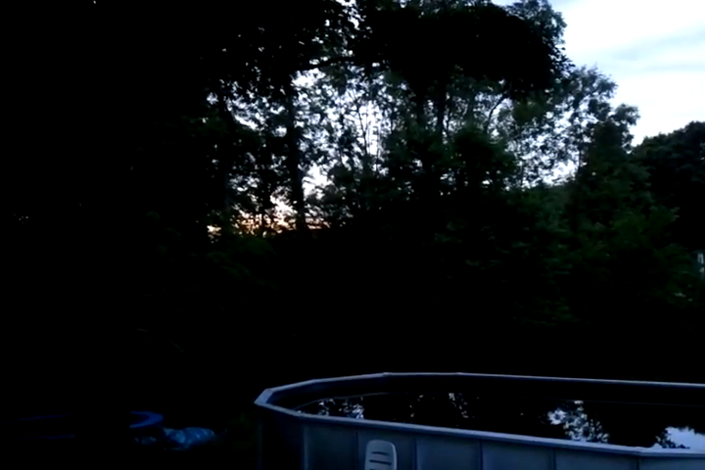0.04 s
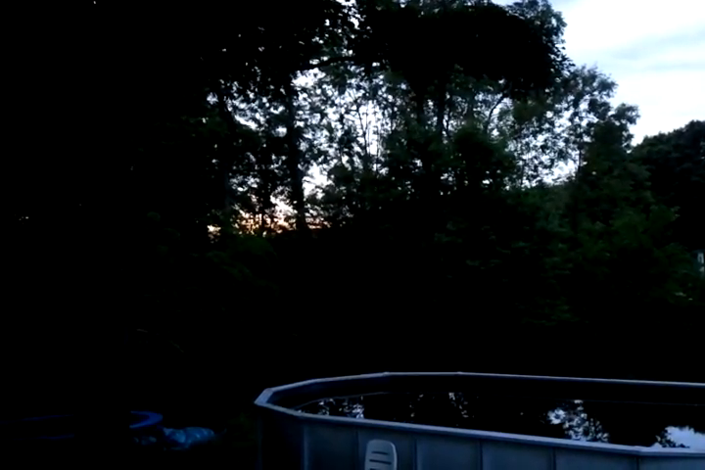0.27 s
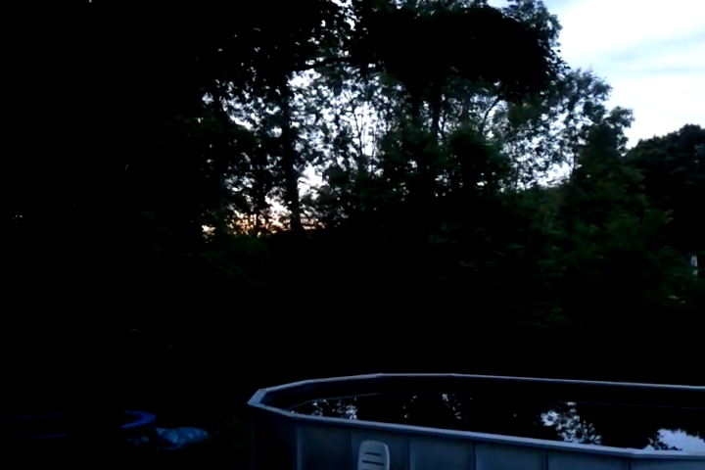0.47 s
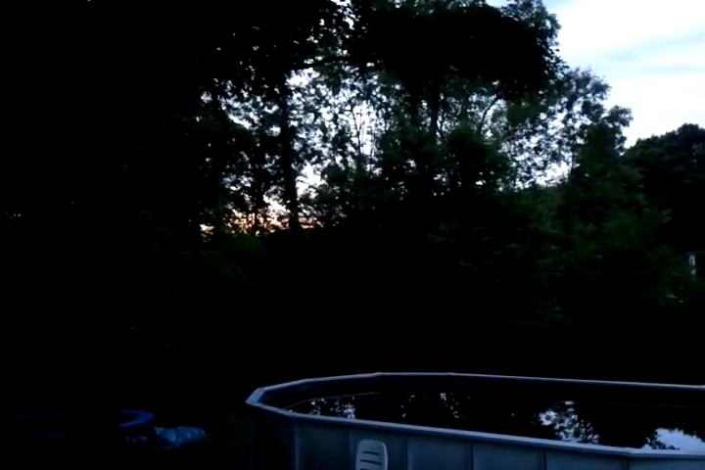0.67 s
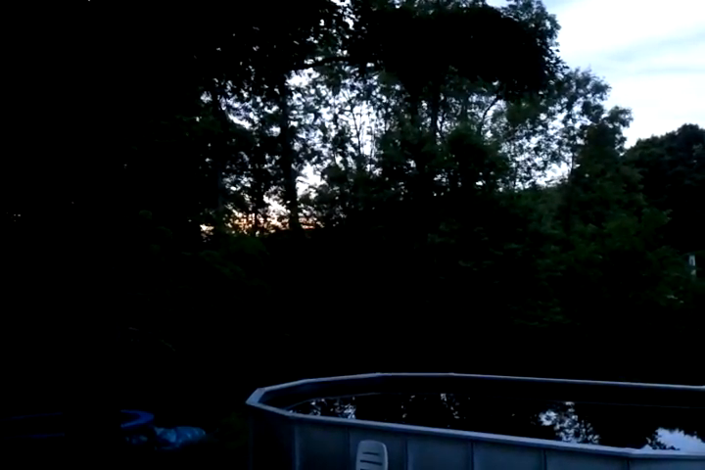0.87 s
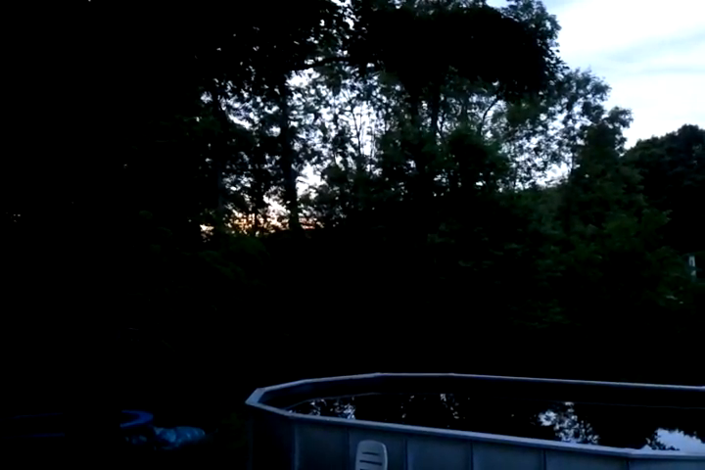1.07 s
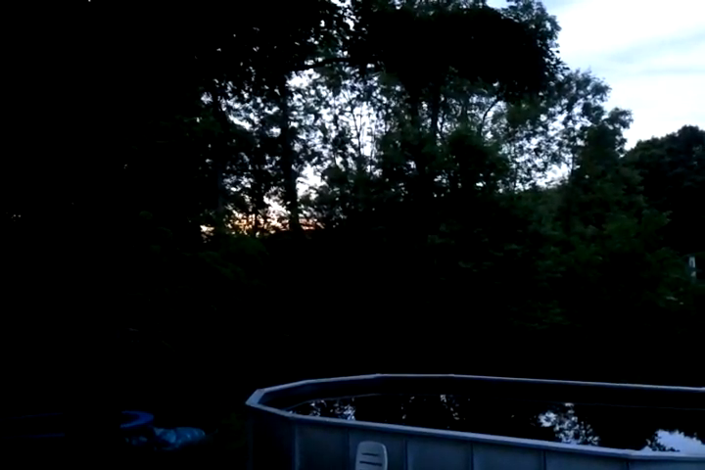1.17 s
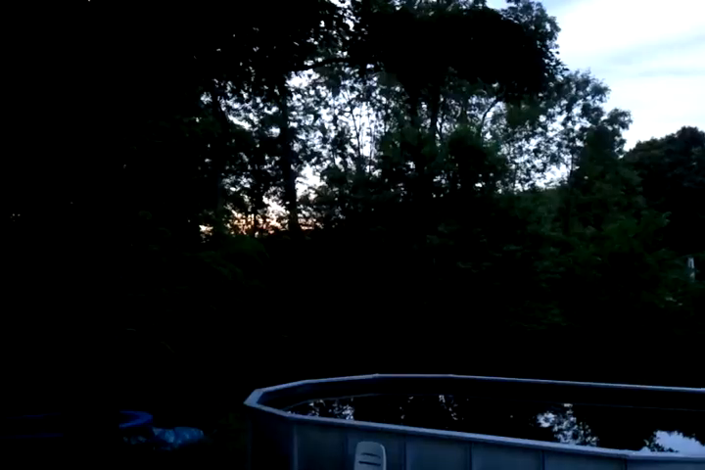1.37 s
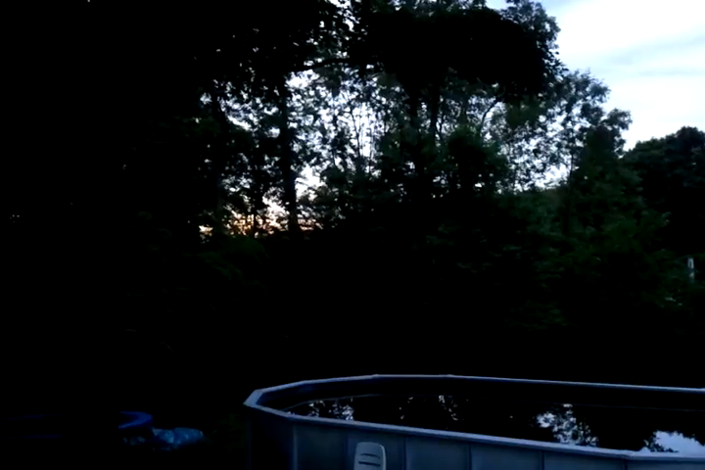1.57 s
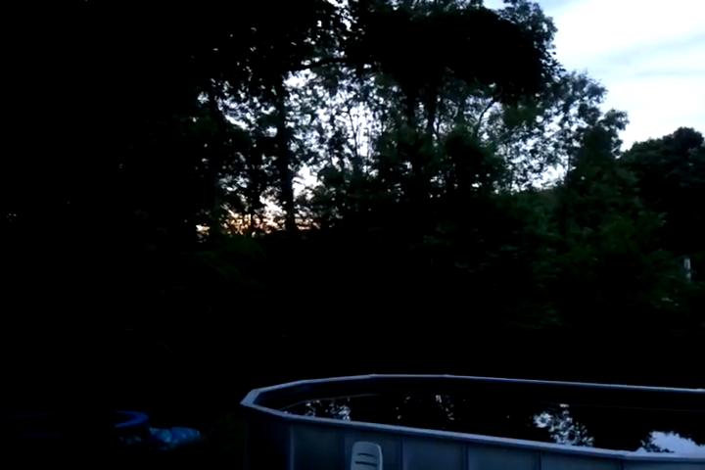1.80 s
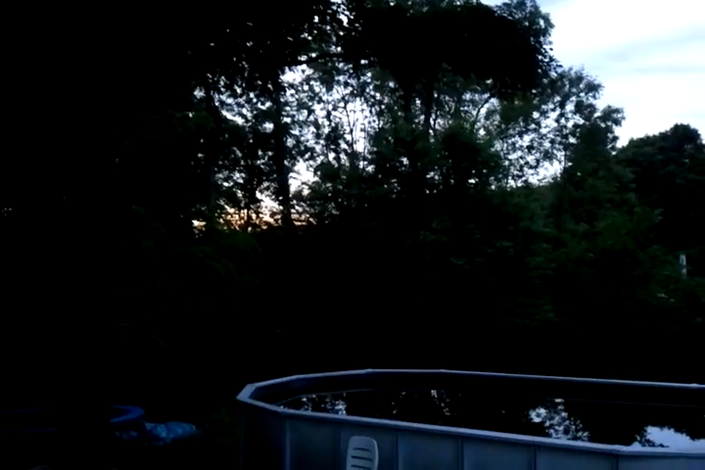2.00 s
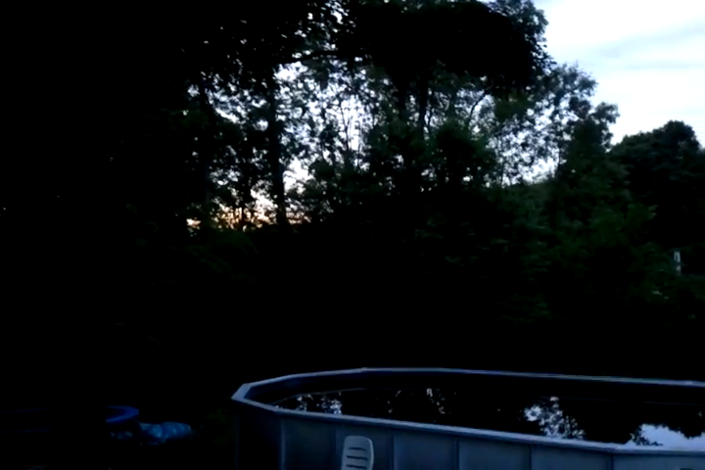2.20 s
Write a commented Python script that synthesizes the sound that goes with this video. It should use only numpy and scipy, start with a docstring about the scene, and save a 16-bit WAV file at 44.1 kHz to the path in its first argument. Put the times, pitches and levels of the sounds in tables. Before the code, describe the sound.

A tree frog gives one rapid trill of eight rising chirps from about 0.1 to 0.5 seconds, growing louder, with quick backyard echoes and a tail fading by about 1 second. A low outdoor rumble lifts with the trill and slowly sinks. A distant bird whistles faintly at the very start, then buzzes and whistles again from about 1.4 to 1.9 seconds.

```python
"""A backyard at dusk, one microphone. A far bird's whistles fade over a low rumble.
A tree frog gives one trill of eight rising chirps, coloured by its vocal sac;
nearby walls throw back quick echoes and the trees a longer tail.
The recorder's expander opens with the trill, lifting the background, and closes slowly.
Then the far bird buzzes and whistles again."""
import sys
import numpy as np
from scipy import signal
from scipy.fft import rfft, irfft
from scipy.io import wavfile
from scipy.ndimage import uniform_filter1d, minimum_filter1d

SR = 44100
rng = np.random.default_rng(int(sys.argv[2]) if len(sys.argv) > 2 else 0)


def digitize_waveform(pressure):
    """Quantize a signal to 16-bit integers and store it at the path in sys.argv[1].

    Rows of a 2-D input are taken as channels; values are limited to [-1, 1].
    """
    field = np.atleast_2d(pressure).T
    bounded = np.clip(field, -1, 1)
    quanta = np.round(bounded * 32767).astype(np.int16)
    wavfile.write(sys.argv[1], SR, quanta)


N = 99225
TIME = np.arange(N) / SR


def from_db(db):
    """Decibels to gain."""
    return 10 ** (np.asarray(db) / 20)


def noise(spectrum, low_cut_hz=27):
    """Noise of rms 1, coloured by (Hz, dB) points and rolled off at the bottom."""
    hz, db = np.transpose(spectrum)
    f = np.maximum(np.fft.rfftfreq(N, 1 / SR), 1)
    colour = from_db(np.interp(np.log(f), np.log(hz), db)) / np.hypot(1, (low_cut_hz / f) ** 2)
    x = irfft(rfft(rng.standard_normal(N)) * colour, N)
    return x / x.std()


def drift(rate_hz):
    """Smooth random wander with a spread of 1."""
    r = np.exp(-2 * np.pi * rate_hz / SR)
    x = signal.lfilter([1], [1, -2 * r, r * r], rng.standard_normal(2 * N))[N:]
    return x / x.std()


def resonance(x, hz, width_hz):
    """One resonance with gain 1 at its peak."""
    r = np.exp(-np.pi * width_hz / SR)
    poles = [1, -2 * r * np.cos(2 * np.pi * hz / SR), r * r]
    return signal.lfilter(np.array([1, 0, -1]) * (1 - r * r) / 2, poles, x + 1e-18)


def scatter(x, t60_s, onset_s=0.0171):
    """Diffuse reflections that build up and die away."""
    build_up = 1 - np.exp(-(TIME / onset_s) ** 2)
    response = rng.standard_normal(N) * from_db(-60 * TIME / t60_s) * build_up
    return signal.fftconvolve(x, response / np.linalg.norm(response))[:N]


# Distant rumble and air, heard from the yard. Each row: frequency in Hz, relative level in dB.
AIR_SPECTRUM = [(19, -44), (32, 4.5), (66, -1), (118, -3.5), (227, -10), (266, -11.5), (298, -15),
                (437, -17.5), (702, -17.5), (786, -16.5), (1380, -19), (2170, -21.5), (2660, -34),
                (5710, -37.5), (7000, -47.5), (9100, -87.5), (15400, -120)]


def background(hum_hz=273.03):
    """Steady outdoor rumble with a faint wavering hum."""
    hum_pitch = hum_hz + 2.26 * drift(rate_hz=10.9)
    hum = np.sin(2 * np.pi * np.cumsum(hum_pitch) / SR)
    return from_db(-34) * noise(AIR_SPECTRUM) + from_db(-46.5) * hum


# The bird's buzz from far off. Each row: frequency in Hz, relative level in dB.
BUZZ_SPECTRUM = [(2500, 4), (3400, 10.5), (4100, 7), (4600, 4), (5200, 8), (6000, 7.5), (7000, -6)]


def bird_buzz(start_s=1.3515, rise_s=0.116, hold_s=0.061, fall_s=0.288):
    """A blurred band of noise swells and fades to open the far bird's song."""
    envelope = np.interp(TIME, np.cumsum([start_s, rise_s, hold_s, fall_s]), [0, 1, 1, 0])
    return from_db(-45.5) * envelope * noise(BUZZ_SPECTRUM)


# The far bird's notes. Each row: start in seconds, length in seconds, first pitch in Hz,
# last pitch in Hz, level in dB, hoarseness (0 is pure, 1 or more is all flutter).
BIRD_NOTES = [(-.03, 0.12, 4330, 3980, -44.5, .2), (-.01, 0.12, 4920, 4960, -44, .8),
              (-.02, .08, 3420, 3164, -64, .5), (1.385, .05, 4050, 4190, -48.5, 0.7),
              (1.481, .11, 4280, 3910, -47, 0.78), (1.567, 0.159, 3700, 3300, -57.5, 0.54),
              (1.569, 0.1063, 4440, 4092, -45.5, 0.31), (1.58, 0.1086, 5170, 5018, -44, 1.17),
              (1.658, 0.0312, 4038, 4084, -42, 0.88), (1.573, 0.3, 2560, 2590, -51, 0.78),
              (1.678, 0.0858, 3400, 3550, -46.5, 0.65), (1.74, 0.069, 3580, 3209, -45.5, 0.15),
              (1.85, 0.045, 4100, 3928, -54, 0.79)]


def bird_whistles(flutter_hz=130):
    """Clear and hoarse gliding whistles, blurred by the woods on their way to the microphone."""
    song = np.zeros(N)
    for start_s, length_s, first_hz, last_hz, db, hoarse in BIRD_NOTES:
        progress = np.clip((TIME - start_s) / length_s, 0, 1)
        hoarse = np.clip(hoarse, 0, 1)
        flutter = (drift(flutter_hz) + 1j * drift(flutter_hz)) / np.sqrt(2)
        roughness = np.sqrt(1 - hoarse ** 2) + hoarse * flutter
        pitch = first_hz + (last_hz - first_hz) * progress
        tone = np.exp(2j * np.pi * np.cumsum(pitch) / SR)
        song += from_db(db) * np.sin(np.pi * progress) * np.real(roughness * tone)
    return song + from_db(-4.5) * scatter(song, t60_s=0.57)


# Echoes off the ground and nearby walls. Each row: delay in seconds, gain as a fraction.
WALL_ECHOES = [(.002337, .338), (.012449, .187), (.020048, .643), (.023653, .236), (.026577, .409),
               (.038178, .147), (.044759, .204)]


def yard_reflections(x):
    """Close surfaces return distinct echoes, the bushes a short tail and the trees a long one."""
    f = np.fft.rfftfreq(2 * N, 1 / SR)
    walls = sum(gain * np.exp(-2j * np.pi * f * delay_s) for delay_s, gain in WALL_ECHOES)
    echoes = irfft(rfft(x, 2 * N) * walls)[:N]
    trees = from_db(-13) * scatter(x, t60_s=1)
    bushes = from_db(-12.5) * scatter(x, t60_s=0.187)
    return echoes + trees + bushes


# The trill's chirps. Each row: time of reaching full strength in seconds, level in dB,
# upward glide at that moment in Hz per second.
TRILL_CHIRPS = [(0.107, -31.5, 12700), (0.1553, -18.5, 11600), (0.2074, -9, 11460), (0.2576, -5.5, 9547),
                (0.3075, -5.5, 8190), (0.3597, -5, 8153), (0.4115, -5, 8817), (0.4642, -4, 8362)]


def trill(pitch_hz=904.1, bend_hz_per_s2=46100, attack_s=0.0235, hold_s=0.00712, release_s=0.00263):
    """Each chirp swells as it glides up, then stops short; the phase is the fundamental's."""
    swell, strength, phase = np.zeros((3, N))
    for peak_s, db, glide in TRILL_CHIRPS:
        age = TIME - peak_s
        shape = np.interp(age, [-attack_s, 0, hold_s, hold_s + release_s], [0, 1, 1, 0]) ** 1.528
        on = shape > 0
        pitch = pitch_hz + glide * age[on] + bend_hz_per_s2 * age[on] ** 2
        swell[on], strength[on] = shape[on], from_db(db)
        phase[on] = 2 * np.pi * (np.cumsum(pitch) / SR + rng.random())
    return swell, strength, phase


# Weaker harmonics beside the dominant second. Each row: multiple of the fundamental, level in dB,
# resonance in Hz, its width in Hz, feed to the reflections in dB, exponent on the chirp's swell,
# exponent on the trill's crescendo.
SAC_HARMONICS = [(1, -14, 1036.5, 77, -17.5, 1.9, 0.328), (1, -8, 1151.4, 70, -1.5, 0.75, 0.43),
                 (3, -14, 2780, 126, -22, 1.8, 0.648), (3, -10.5, 3042, 140, -6.5, 0.33, 2),
                 (4, -40, 2700, 1400, -4, 0.61, 0.52), (6, -45, 4700, 1200, 1, 1.5, 0.41),
                 (7, -49, 6400, 1200, 1, 1.3, 1.2)]


def tree_frog(rasp_band_hz=(2600, 4200)):
    """The frog in the yard: its harmonics sweep through resonances of the vocal sac, with a faint rasp."""
    swell, strength, phase = trill()
    effort = swell * strength
    direct = to_yard = effort * np.sin(2 * phase)
    for multiple, db, hz, width_hz, echo_db, swell_power, crescendo_power in SAC_HARMONICS:
        harmonic = swell ** swell_power * strength ** crescendo_power * np.sin(multiple * phase)
        partial = from_db(db) * resonance(harmonic, hz, width_hz)
        direct = direct + partial
        to_yard = to_yard + from_db(echo_db) * partial
    rasp_filter = signal.butter(1, rasp_band_hz, "band", fs=SR, output="sos")
    rasp = from_db(-32.5) * effort * signal.sosfilt(rasp_filter, rng.standard_normal(N))
    # The lowest partial lingers in the yard on its own.
    low_ring = resonance(effort * np.sin(phase), hz=976.8, width_hz=70)
    return direct + rasp + yard_reflections(to_yard) + from_db(-14.5) * scatter(low_ring, t60_s=0.484)


def scene():
    """Frog, far bird and background at one microphone."""
    return (tree_frog() + bird_whistles() + bird_buzz() + background())[None]


def expander_gain(x, open_s=0.2564, close_s=0.913, rest_gain=0.1049, gain_per_level=4.955, block=128):
    """Gain that rises with the sound's level and sinks slowly afterwards."""
    levels = np.sqrt(np.abs(uniform_filter1d(x * x, 2 * block)))[::block]
    held = [0.]
    for level in levels:
        lag_s = open_s if level > held[-1] else close_s
        held.append(held[-1] + (level - held[-1]) * block / SR / lag_s)
    return rest_gain + gain_per_level * np.interp(np.arange(N) / block, np.arange(len(held)), held)


def limiter(x, ceiling=0.523, window_s=0.002):
    """Turns the loudest peaks down smoothly."""
    span = int(window_s * SR)
    gain = ceiling / np.maximum(np.abs(x), ceiling)
    return x * uniform_filter1d(minimum_filter1d(gain, span), span)


def record(dry, bias=-0.1347, cutoff_hz=7050):
    """The recorder expands and limits, adds hiss and an offset that follows its gain, and cuts the top."""
    gain = expander_gain(dry[0])
    hiss = from_db(-65.5) * noise([(200, -26), (3000, -4), (5000, -14.5), (7000, -21)])
    low_pass = signal.ellip(10, .3, 70, cutoff_hz, fs=SR, output="sos")
    return signal.sosfilt(low_pass, limiter(dry * gain) + bias * gain + hiss)


dry = scene()
out = record(dry)
digitize_waveform(out)
```